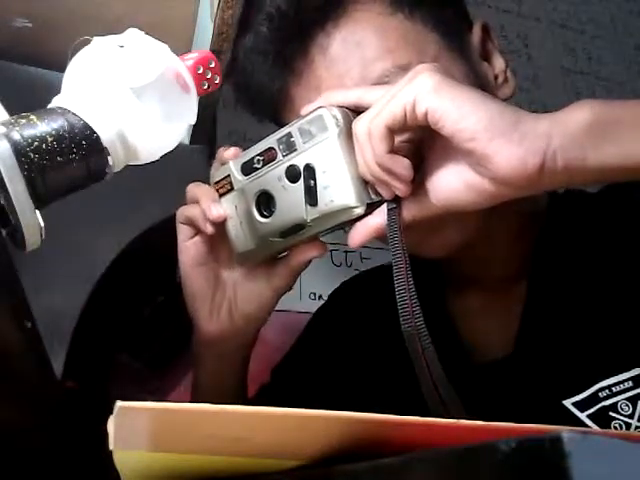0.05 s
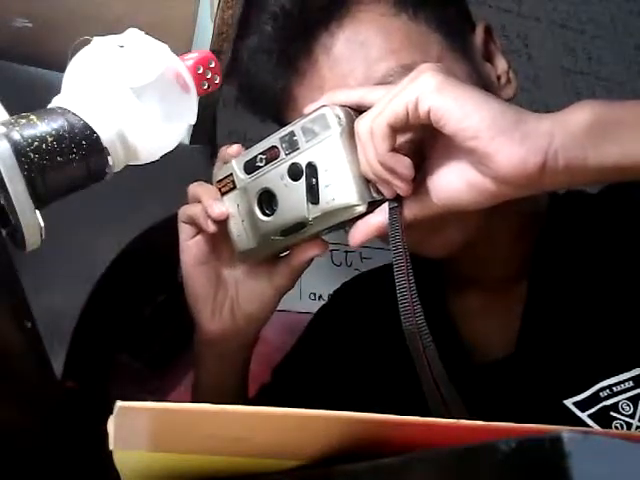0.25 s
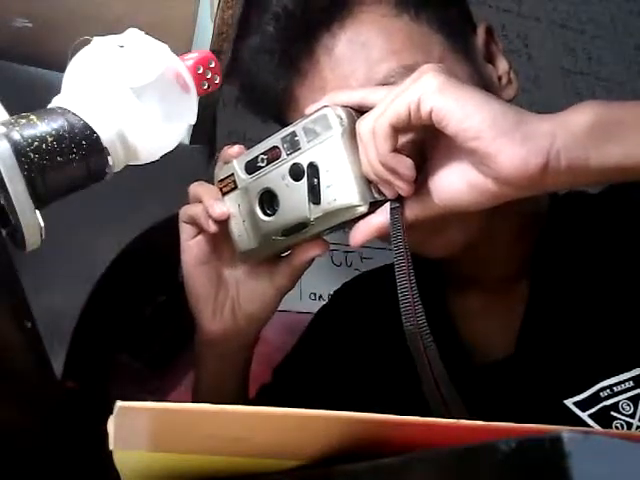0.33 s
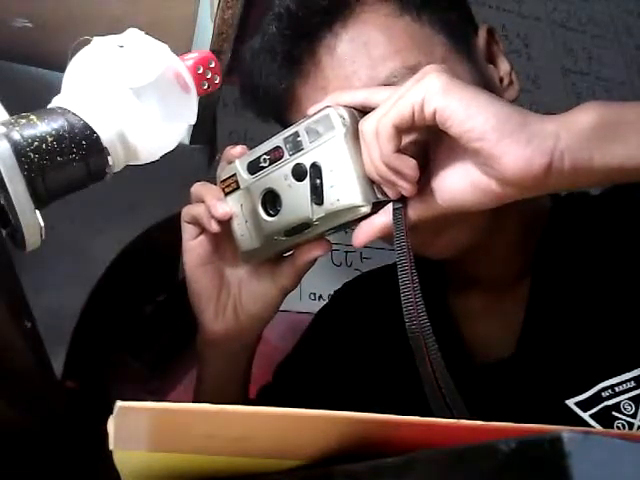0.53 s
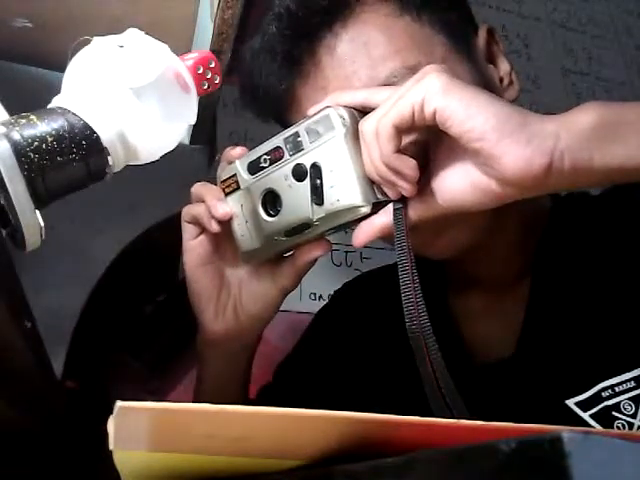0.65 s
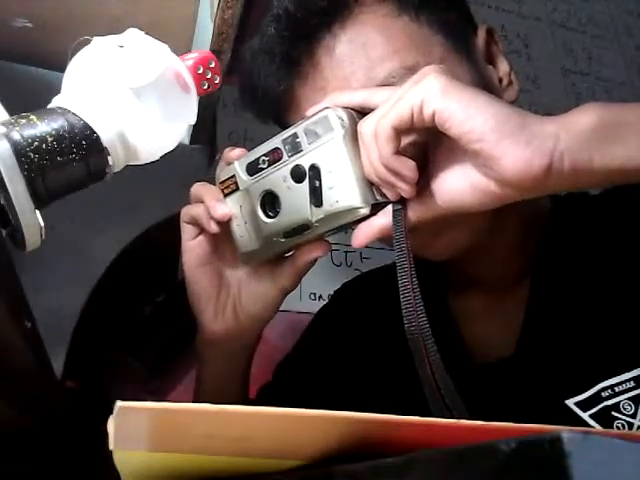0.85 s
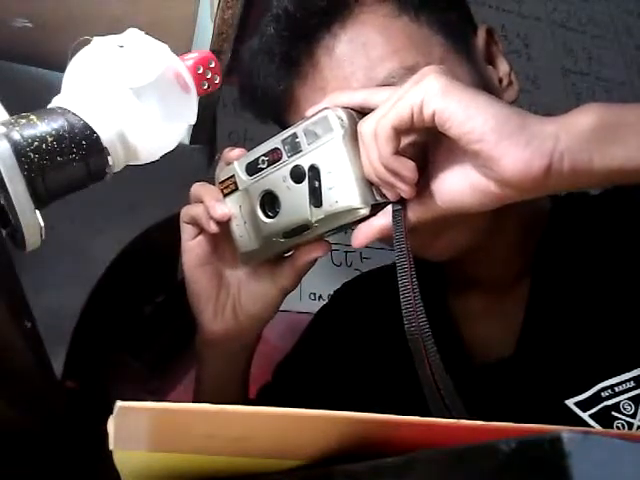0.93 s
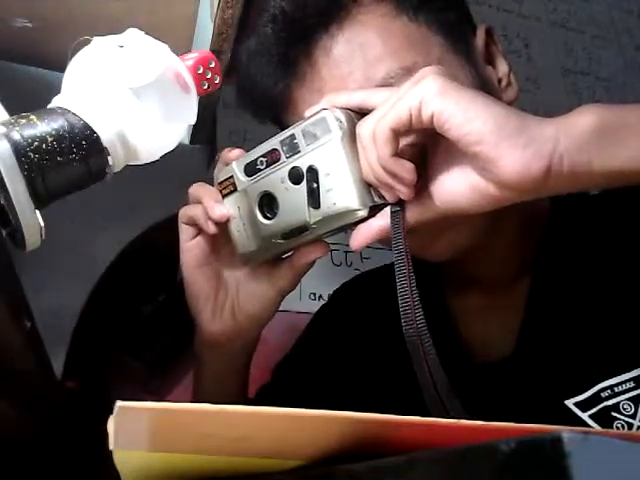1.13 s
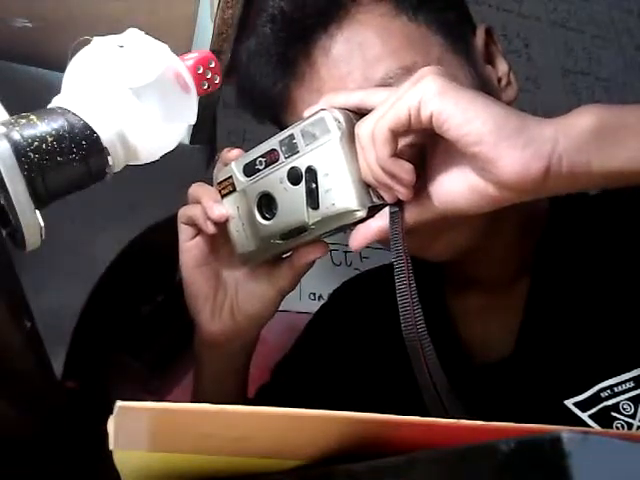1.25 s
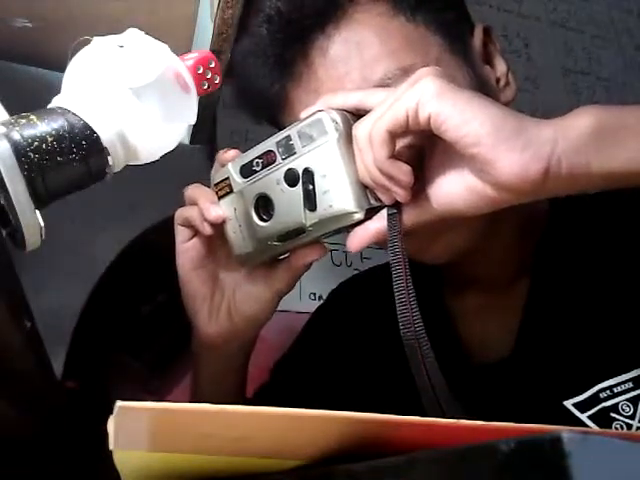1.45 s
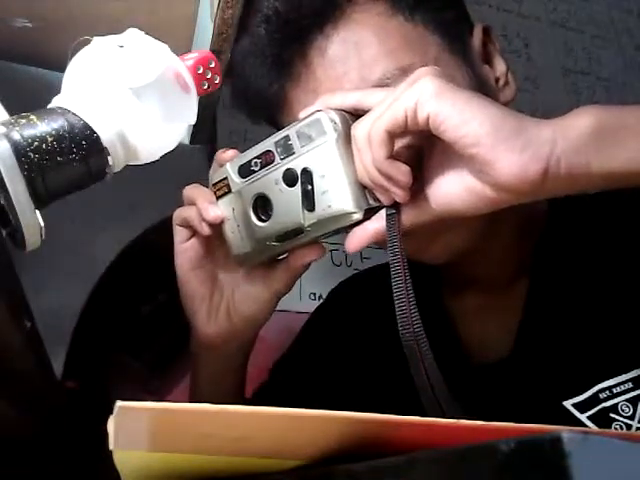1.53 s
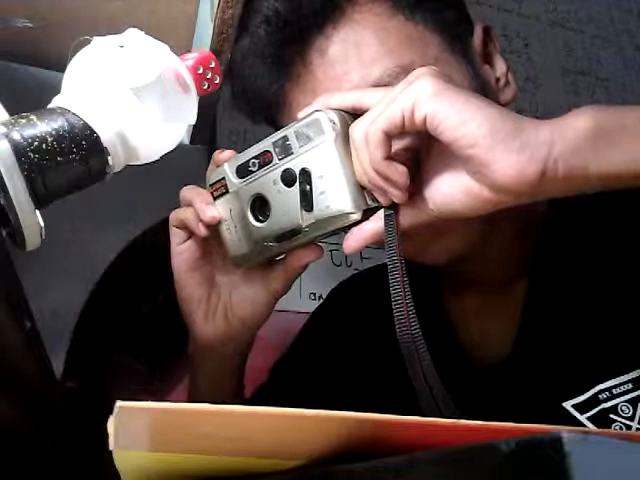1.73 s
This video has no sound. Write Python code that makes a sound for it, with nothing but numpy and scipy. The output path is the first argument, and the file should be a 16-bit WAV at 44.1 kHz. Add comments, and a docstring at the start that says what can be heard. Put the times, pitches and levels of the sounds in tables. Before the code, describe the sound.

A compact camera's motor winds film in a small quiet room, heard close. After a barely audible high whistle, it starts at 0.1 s with light ticks, climbing to a buzzy, rattling whirr by 0.5 s. Pitch sags around 0.8-1.0 s, with a hard knock near 0.97, then climbs until 1.5 s amid scraping and hollow plastic droning. It stops by 1.6 s, leaving faint rising whistles and soft room hush.

```python
"""A small motor winds the film on inside a plastic compact camera, in a quiet room.
First the flash charger whistles faintly: thin rising tones. Then the motor spins up, and each pinion tooth
taps the next gear: this mesh rate climbs, sags under load and climbs again. Once a turn the gears rattle.
On the way come gear noise, droning spells, knocks and scraping, which ring or are coloured by the camera.
As the motor runs down the charger whistles again, and the soft room tone is left."""
import sys
import numpy as np
from scipy import signal
from scipy.fft import rfft, irfft, next_fast_len
from scipy.io import wavfile
from scipy.ndimage import uniform_filter1d

SR = 44100
rng = np.random.default_rng(int(sys.argv[2]) if len(sys.argv) > 2 else 0)


def boost(x):
    """Linear amplitude factor 10**(x/20) for a level x in decibels (scalar or array-like)."""
    u = np.asarray(x, float) / 20
    return 10 ** u


def transcribe(signal):
    """Save signal, clipped to [-1, 1], as a 16-bit WAV file at the path in sys.argv[1]."""
    frames = np.atleast_2d(signal).T
    limited = np.clip(frames, -1, 1)
    pcm = np.round(limited * 32767).astype(np.int16)
    wavfile.write(sys.argv[1], SR, pcm)


N = 79380  # samples, 1.8 s


def rms_one(x):
    """Scale a sound to an average (rms) level of one."""
    return x / np.sqrt(np.mean(x ** 2) + 1e-20)


def curve(rows, column=1):
    """Draw straight lines between the rows of a table to get a value for every sample."""
    rows = np.array(rows)
    return np.interp(np.arange(N) / SR, rows[:, 0], rows[:, column])


def level(rows, column=1):
    """Turn a dB column into a gain that fades in at the first row and out after the last."""
    t = np.arange(N) / SR
    fade_in = np.clip((t - rows[0][0]) / 0.01, 0, 1)
    fade_out = np.clip((rows[-1][0] + 0.04 - t) / 0.04, 0, 1)
    return boost(curve(rows, column)) * fade_in * fade_out


def colour(x, spectrum, peaks=()):
    """Filter by a broad spectrum plus resonant boosts, with as little delay as possible (minimum phase)."""
    size = 2 * next_fast_len(N // 2 + 4096)
    hz = np.maximum(np.arange(size // 2 + 1) * SR / size, 1)
    spectrum = np.array(spectrum)
    db = np.interp(np.log(hz), np.log(spectrum[:, 0]), spectrum[:, 1])
    for peak_hz, width, boost_db in peaks:
        db = db + boost_db / (1 + (2 * (hz - peak_hz) / width) ** 2)
    # folding the cepstrum (the transform of the log spectrum) forward gives the minimum phase
    cepstrum = irfft(np.maximum(db, -90) * np.log(10) / 20, size)
    cepstrum[1:size // 2] *= 2
    cepstrum[size // 2 + 1:] = 0
    return irfft(rfft(x, size) * np.exp(rfft(cepstrum)), size)[:N]


def modes(x, table):
    """Let a sound ring several resonances side by side; a wider one dies away faster."""
    out = 0
    for k, (hz, width, db) in enumerate(table):
        r = np.exp(-np.pi * width / SR)
        poles = [1, -2 * r * np.cos(2 * np.pi * hz / SR), r * r]
        ring = signal.lfilter([1 - r, 0, r - 1], poles, x + 1e-18)
        out = out + (-1) ** k * boost(db) * ring  # every other one upside down
    return out


# colour of the quiet room: (f/Hz, level/dB per Hz)
ROOM_COLOUR = [(20, -15), (40, -20), (80, -19.5), (130, -16), (330, -16.5), (500, -10.5), (700, -11),
               (1320, -10.5), (2200, -15), (4000, -25.5), (6000, -27), (9000, -33), (13000, -34),
               (15900, -32)]


def room_tone():
    """The steady hush of the room: coloured noise."""
    return boost(-61) * rms_one(colour(rng.standard_normal(N), ROOM_COLOUR))


def room_echo(x):
    """A short, dull echo: the sound smeared by noise that falls 60 dB in T60_S."""
    T60_S, ECHO_DB = 0.23, -16
    t = np.arange(SR // 2) / SR
    dull_noise = signal.lfilter([1], [1, -0.6], rng.standard_normal(len(t)))
    tail = dull_noise * boost(-60 * t / T60_S) * (t > 0.004)
    return boost(ECHO_DB) * signal.fftconvolve(x, tail / np.sqrt(np.sum(tail ** 2)))[:N]


# whistles of the flash charger: (start t/s, end t/s, start f/Hz, end f/Hz, level/dB)
WHISTLES = [(0.0, .075, 13420, 13560, -87), (.075, .125, 13560, 14000, -83), (1.53, 1.63, 8850, 9350, -83),
            (1.69, 1.82, 9680, 10260, -86)]


def charger():
    """Faint whistles of the flash charger: sine tones gliding upwards."""
    t, out = np.arange(N) / SR, 0
    for start, end, start_hz, end_hz, db in WHISTLES:
        share = np.clip((t - start) / (end - start), 0, 1)
        hz = start_hz + (end_hz - start_hz) * share
        on = np.clip(np.minimum(t - start, end - t) / 0.004 + 0.5, 0, 1)
        out = out + np.sqrt(2) * boost(db) * on * np.sin(2 * np.pi * np.cumsum(hz) / SR)
    return out


# speed of the motor as teeth meeting per second: (t/s, mesh rate f/Hz)
MOTOR = [(.1, 165), (.17, 275), (.28, 495), (.37, 615), (.45, 678), (.56, 705), (.65, 670), (.76, 610),
         (.8, 572), (.97, 525), (1.0, 530), (1.07, 595), (1.17, 628), (1.26, 700), (1.31, 725), (1.4, 772),
         (1.49, 826), (1.55, 840), (1.62, 760)]


def teeth_passed():
    """Running count of the teeth that have met, from the mesh rate."""
    return np.cumsum(curve(MOTOR)) / SR


def pinion_turns():
    """Running count of turns of the ten-toothed pinion."""
    return teeth_passed() / 10


def rattle(depth, sharp=1.18):
    """A burst once a pinion turn, each of its own strength and a little off time."""
    LATENESS_TURNS, SPREAD_DB = 0.16, 2
    turns = pinion_turns()
    draw = rng.standard_normal((400, 2))
    turns = turns + LATENESS_TURNS * np.interp(turns, np.arange(400), draw[:, 0])
    strength = boost(SPREAD_DB * draw[turns.astype(int) % 400, 1])
    burst = np.exp(-sharp * (turns % 1)) * strength
    depth = np.clip(depth, 0, 1)
    return 1 - depth + depth * rms_one(uniform_filter1d(burst, size=60))


# treble colour: (f/Hz, level/dB per Hz), and its resonances: (f/Hz, width f/Hz, boost level/dB)
HISS = [(2650, -31), (4500, -1), (5410, -12.5), (6100, -5.5), (6640, -10.5), (7810, -6.5), (10500, -6),
        (15800, -9)]
HISS_PEAKS = [(6280, 54, 13), (7130, 130, 9.6), (7900, 200, 7.1), (8600, 91, 3.8), (9700, 290, 2.6),
              (10620, 430, 5.8), (11300, 260, 4), (12300, 200, 1.8)]
# loudness of the scraping: (t/s, level/dB)
TREBLE = [(0.1, -75), (0.19, -71), (0.2, -61), (0.288, -50), (0.534, -43.5), (0.806, -47), (1.24, -45.5),
          (1.278, -42.5), (1.49, -45.5), (1.6, -71.5)]


def treble():
    """Fine scraping of teeth and film: hiss pulsing with the pinion turns."""
    scrape = rng.standard_normal(N) * rattle(0.27, sharp=3.5)
    return rms_one(colour(scrape, HISS, HISS_PEAKS)) * level(TREBLE)


# louder knocks in the gear train: (t/s, level/dB before the scuff and click gains, treble level/dB)
KNOCKS = [(0.1154, -44, -70), (0.1516, -56, -60), (0.2004, -28, -54), (0.2234, -40, -50),
          (0.2506, -26, -48), (0.2723, -19.5, -43), (0.3234, -19, -42), (0.372, -27, -37.5),
          (0.3992, -36, -43), (0.4444, -44, -37), (0.6634, -21, -47), (0.7503, -13.5, -35),
          (0.7794, -32, -54), (0.7954, -32, -47), (0.9233, -26, -39), (0.9734, -6.5, -33),
          (1.0044, -19.5, -44), (1.038, -21, -38), (1.0996, -15, -32.5), (1.146, -26, -33.5),
          (1.3584, -16, -62), (1.4217, -29, -34.5)]
# shell modes struck by a knock: (f/Hz, width f/Hz, level/dB)
KNOCK_MODES = [(1270, 200, -8), (1600, 250, -3), (1890, 200, 0), (2200, 250, -2), (2550, 250, -5),
               (3946, 120, -6)]


def knocks():
    """Each knock is a click and a short scuff that ring the shell and tick in the treble."""
    RISE_S, FALL_S = 0.001, 0.0045
    SCUFF_DB, CLICK_DB = 6.5, 10.5
    t, strike, treble_gain = np.arange(N) / SR, np.zeros(N), np.zeros(N)
    scuff_noise, tick_noise = rng.standard_normal((2, N))
    for s, db, treble_db in KNOCKS:
        age = np.maximum(t - s, 0)
        shape = (1 - np.exp(-age / RISE_S)) * np.exp(-age / FALL_S)
        strike = strike + boost(db + SCUFF_DB) * shape * scuff_noise
        strike[int((s + RISE_S) * SR)] += boost(db + CLICK_DB)
        treble_gain = treble_gain + boost(treble_db) * shape
    no_bass = signal.butter(2, 700, "high", fs=SR, output="sos")
    ring = signal.sosfilt(no_bass, modes(strike, KNOCK_MODES))
    return ring + treble_gain * rms_one(colour(tick_noise, HISS, HISS_PEAKS))


# spells in which the gears bear hard and the shell drones: (start t/s, length t/s, level/dB)
DRONE = [(0.13, 0.018, -56), (.151, 0.051, -67), (0.194, 0.025, -41.5), (0.234, 0.025, -39.5),
         (.273, 0.0064, -26.5), (0.292, 0.02, -34.5), (0.354, 0.013, -31), (0.368, 0.014, -26),
         (0.398, 0.024, -28.5), (0.439, .067, -27), (0.537, .012, -19), (0.554, 0.032, -24),
         (0.593, 0.029, -23.5), (0.631, 0.023, -27), (.71, 0.015, -24.5), (0.722, 0.014, -40),
         (0.743, 0.019, -27), (0.782, 0.018, -31.5), (0.824, 0.037, -31), (0.87, 0.049, -34.5),
         (0.935, 0.031, -32), (0.994, 0.019, -29), (1.03, 0.016, -30), (1.073, 0.011, -31),
         (1.088, 0.034, -28), (1.14, 0.024, -28), (1.21, 0.028, -21), (1.247, 0.074, -25.5),
         (1.334, 0.0061, -23), (1.347, 0.042, -27), (1.419, 0.072, -37), (1.535, 0.028, -44.5)]


def spells():
    """Gain of the drone, and a gate from 0 to 1 that opens when the gears bear hard."""
    RISE_S, FALL_S = 0.0022, 0.0032
    t, gain, gate = np.arange(N) / SR, np.zeros(N), np.zeros(N)
    for s, length, db in DRONE:
        rise = 1 - np.exp(-np.maximum(t - s, 0) / RISE_S)
        fall = np.exp(-np.maximum(t - s - length, 0) / FALL_S)
        gain = np.maximum(gain, boost(db) * rise * fall)
        gate = np.maximum(gate, rise * fall)
    return gain, gate


def thuds():
    """One soft thud each pinion turn: a single pulse, a little off time and of its own strength."""
    JITTER_TURNS, SPREAD_DB = 0.02, 2.5
    turns, draw, out = pinion_turns(), rng.standard_normal((400, 2)), np.zeros(N)
    k = np.arange(1, int(turns[-1]))
    places = np.interp(k + JITTER_TURNS * draw[k, 0], turns, np.arange(N)).astype(int)
    out[places] = boost(SPREAD_DB * draw[k, 1])
    return rms_one(out)


# low modes of the shell: (f/Hz, width f/Hz, level/dB)
DRONE_MODES = [(795, 88, -1), (887, 67.5, 2), (930, 45.7, -3)]
# the tone at the mesh rate while the gears bear: (t/s, level/dB)
MESH_TONE = [(.18, -73), (.22, -59), (.28, -54), (.37, -40), (.45, -31.5), (.56, -40), (.65, -33),
             (.75, -40), (.8, -49.5), (.97, -57), (1.07, -41.5), (1.17, -38), (1.28, -31), (1.4, -31),
             (1.47, -28.5), (1.52, -49), (1.58, -55)]


def drone():
    """While the gears bear hard, the low modes of the shell sound and the mesh tone swells."""
    THUD_DB, SLACK_DB = 5, -10  # thuds against the noise; mesh tone gain between spells
    gain, gate = spells()
    push = rng.standard_normal(N) * rattle(0.25) + boost(THUD_DB) * thuds()
    narrow = signal.butter(2, [680, 1020], "band", fs=SR, output="sos")
    hum = signal.sosfilt(narrow, modes(push, DRONE_MODES))
    hum = hum / np.sqrt(uniform_filter1d(hum ** 2, size=330) + 1e-12)  # even out the loudness
    wide = signal.butter(2, [500, 1500], "band", fs=SR, output="sos")
    hum = signal.sosfilt(wide, hum * gain)
    tone = np.sqrt(2) * np.sin(2 * np.pi * teeth_passed()) * level(MESH_TONE)
    return hum + tone * uniform_filter1d(gate + boost(SLACK_DB) * (1 - gate), size=130)


# overtones of the mesh tone: (multiple of the mesh rate, level/dB)
OVERTONES = [(2.0, 0), (3.0, 3), (4.0, 4), (5.0, 1), (6.0, 0.5)]


def whine():
    """Overtones of the mesh rate, their pitch wavering slightly, over every few teeth."""
    WAVER_CYCLES = 0.065
    count = teeth_passed()
    draw = rng.standard_normal(2000)
    waver = WAVER_CYCLES * np.interp(count / 4, np.arange(2000), draw)  # glides to a new draw every four teeth
    phase = 2 * np.pi * (count + waver)
    out = 0
    for multiple, db in OVERTONES:
        out = out + boost(db) * np.sin(np.round(multiple) * phase + rng.uniform(0, 2 * np.pi))
    return out * rattle(0.55)


# broad colour of the shell: (f/Hz, level/dB per Hz), and its resonances: (f/Hz, width f/Hz, boost level/dB)
SHELL = [(100, -46), (200, -33), (280, -28), (490, -31.5), (640, -7), (810, -8), (1010, -6), (1280, -7),
         (1420, -13), (1690, -10.5), (2640, -10), (4000, -23.5), (5100, -27), (5500, -36.5), (7000, -65)]
SHELL_PEAKS = [(274.1, 32, 15.5), (1276, 58, 5), (1687, 110, 7.5), (2554, 97, 3.5), (3480, 256, 8.5),
               (4010, 130, 5.5), (4160, 190, -6.5), (4900, 400, 4.5)]
# gain of the whine in its mix with the grinding: (t/s, level/dB)
WHINE = [(.1, -22.5), (.25, -6), (.33, -4.5), (.55, 0), (.75, -4.5), (.9, -2), (1.0, -9), (1.15, -4),
         (1.3, -1.5), (1.4, -12), (1.62, -22)]
# loudness of the gear noise: (t/s, level/dB)
GEARS = [(0.1, -78), (0.132, -42), (0.142, -52), (0.166, -41), (0.324, -33), (0.502, -31), (0.518, -34.5),
         (0.582, -28.5), (0.594, -30), (0.894, -33), (0.966, -32.5), (0.98, -33.5), (0.992, -32.5),
         (1.006, -32.5), (1.466, -29.5), (1.534, -35), (1.59, -58.5), (1.62, -79)]


def gears():
    """Whine and grinding noise of the meshing teeth, heard through the shell; slow gears grind dull."""
    GRIND_DB = -1.5
    DULL_AT_HZ, BRIGHT_AT_HZ, DULL_CUT_HZ = 92, 446, 1950  # two mesh rates, then the low-pass filter
    grind = rng.standard_normal(N) * rattle(0.74)
    drive = boost(curve(WHINE)) * rms_one(colour(whine(), SHELL, SHELL_PEAKS))
    drive = drive + boost(GRIND_DB) * rms_one(colour(grind, SHELL, SHELL_PEAKS))
    bright = np.clip((curve(MOTOR) - DULL_AT_HZ) / (BRIGHT_AT_HZ - DULL_AT_HZ), 0, 1)
    dull = signal.sosfilt(signal.butter(2, DULL_CUT_HZ, fs=SR, output="sos"), drive)
    return (bright * drive + (1 - bright) * dull) * level(GEARS)


def scene():
    """Room tone, the charger, and the camera's works with their echo in the room."""
    camera = treble() + knocks() + drone() + gears()
    return (room_tone() + charger() + camera + room_echo(camera))[None]


def roll_off(x):
    """The treble ends steeply here."""
    return signal.sosfilt(signal.butter(12, 15950, fs=SR, output="sos"), x)


def record(dry):
    """The finished mix as it is stored."""
    return roll_off(dry)


dry = scene()
out = record(dry)
transcribe(out)
```